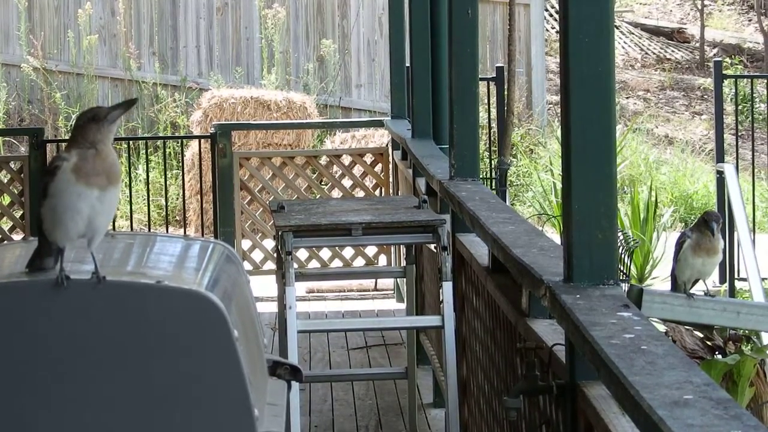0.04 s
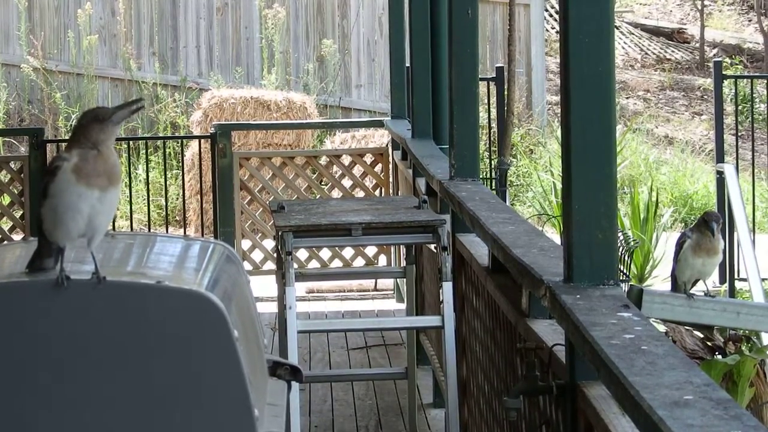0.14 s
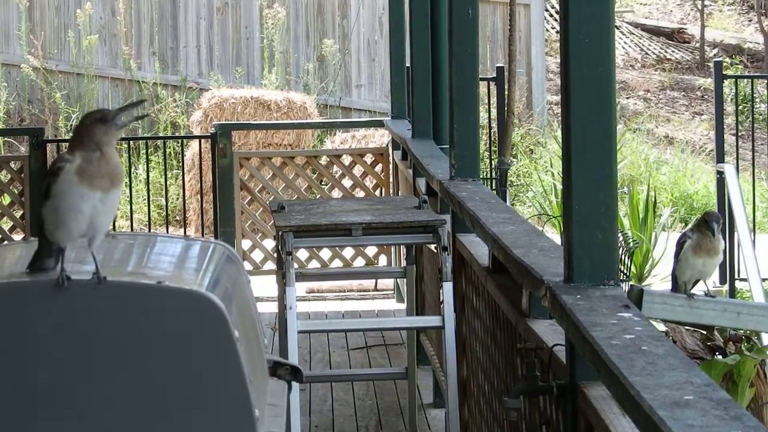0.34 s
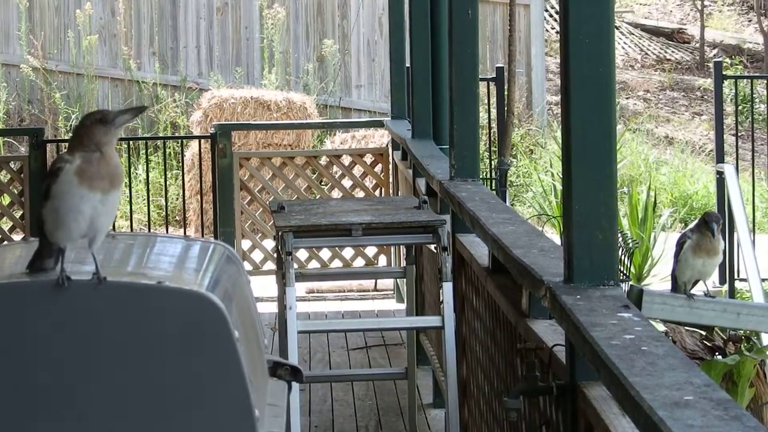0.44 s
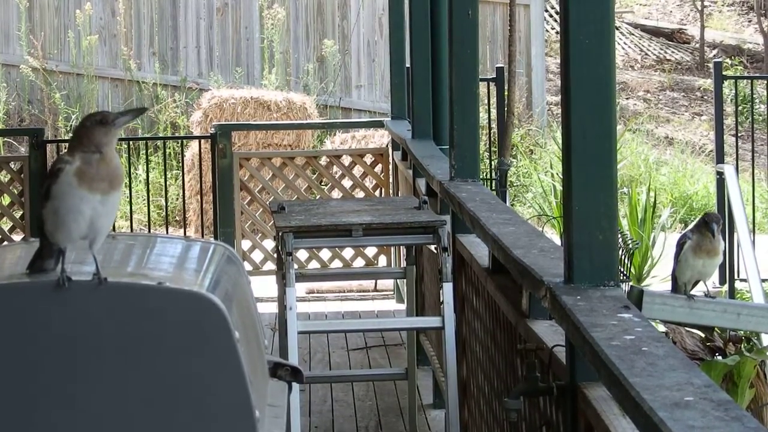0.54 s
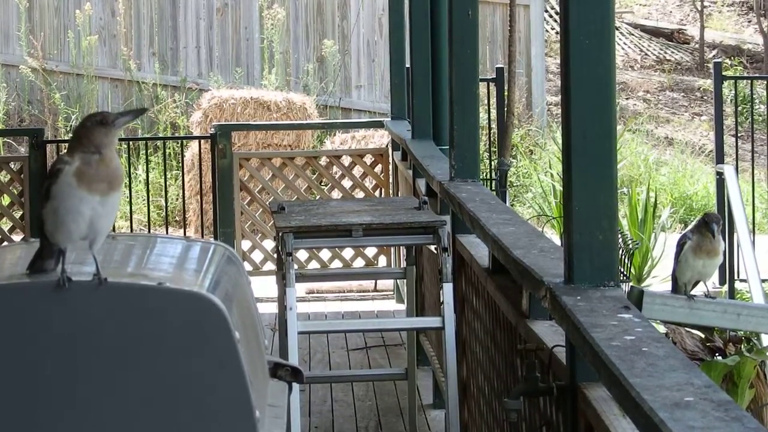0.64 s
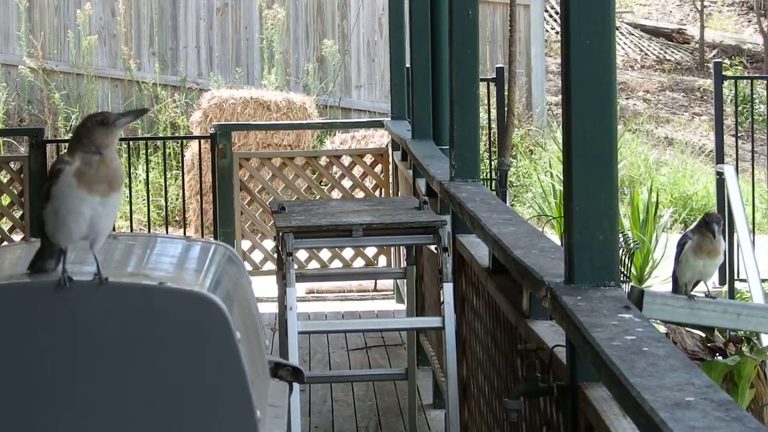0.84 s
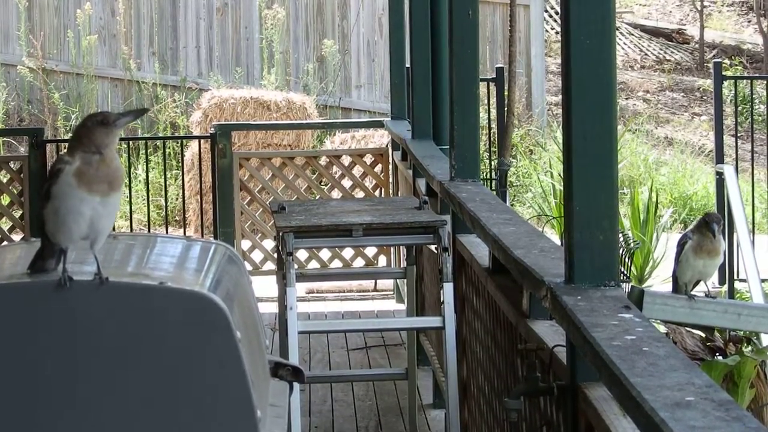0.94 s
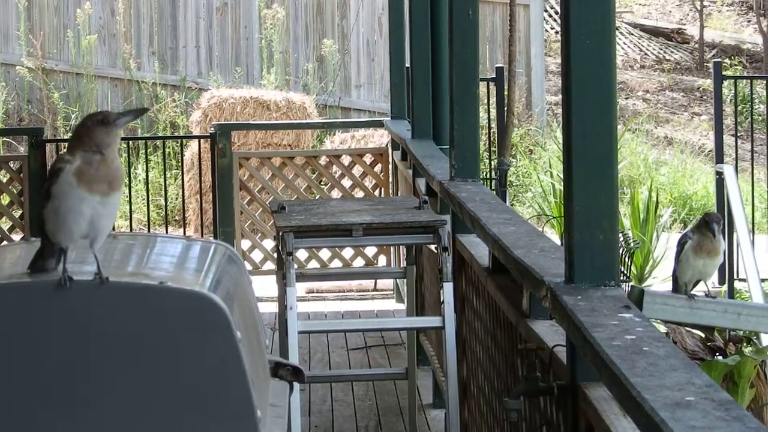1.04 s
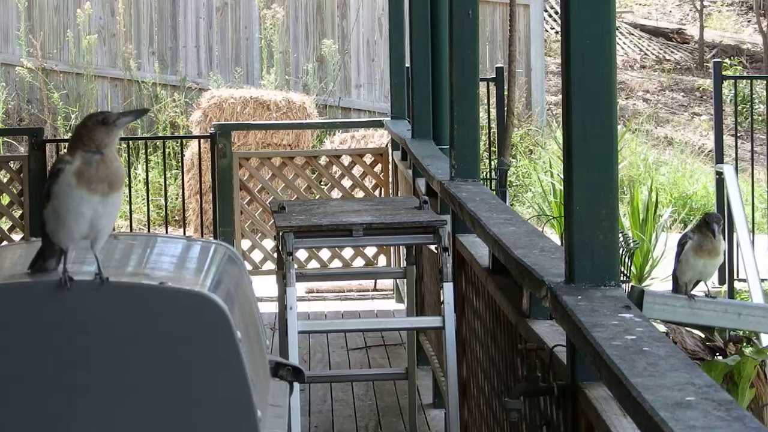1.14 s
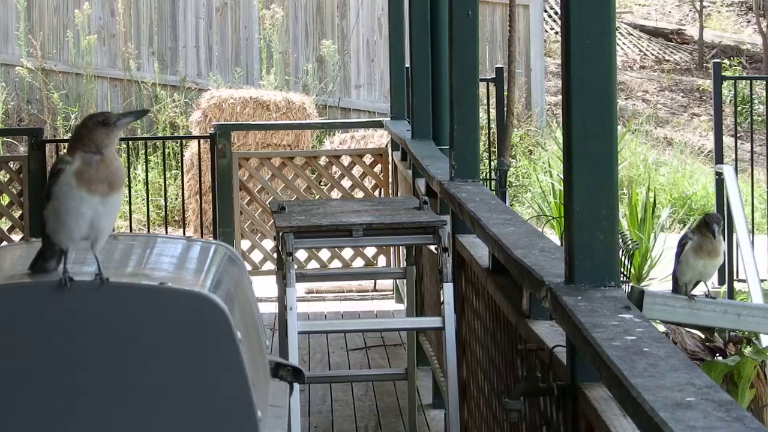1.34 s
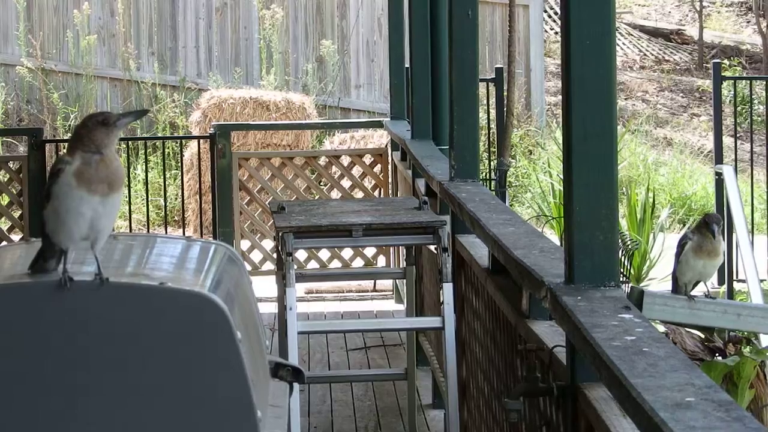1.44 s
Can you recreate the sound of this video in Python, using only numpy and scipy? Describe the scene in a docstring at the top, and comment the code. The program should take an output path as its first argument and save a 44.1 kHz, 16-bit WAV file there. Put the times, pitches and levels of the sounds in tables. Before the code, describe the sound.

A close bird's raspy screech snaps into a fading whistle, with insects hissing behind.

```python
"""A garden deck: insects hiss over a low rush and a faint drone. An earlier whistle dies away and far
birds pipe short fluty notes. At 0.13 s a young butcherbird begs close by: the two sides of its syrinx
clash in a rasp that swells into a screech as the beak opens. Near 0.37 s it snaps into a warbling,
fading whistle. The far birds pipe on, rush and insects grow, and a soft bump lands at 1.38 s."""
import sys
import numpy as np
from scipy import signal
from scipy.fft import rfft, irfft
from scipy.io import wavfile
from scipy.ndimage import uniform_filter1d

SR = 44100
rng = np.random.default_rng(int(sys.argv[2]) if len(sys.argv) > 2 else 0)


def wav_record(signal):
    """Record a signal, one row per channel, as 16-bit PCM in the file named by sys.argv[1]."""
    frames = np.transpose(np.atleast_2d(signal))
    bounded = np.clip(frames, -1, 1)
    # unit amplitude maps onto the largest positive 16-bit level
    quanta = np.round(bounded * 32767).astype(np.int16)
    wavfile.write(sys.argv[1], SR, quanta)


N = 66150
TIME = np.arange(N) / SR


def from_db(db):
    """Decibels to gain."""
    return 10 ** (np.asarray(db) / 20)


def unit_rms(x):
    """Scale to unit power."""
    return x / np.sqrt(np.mean(x ** 2) + 1e-20)


def automation(rows):
    """One curve per value column, ramping between the times in the first column."""
    times, *columns = np.transpose(rows)
    return [np.interp(TIME, times, column) for column in columns]


def gate(rows):
    """Open between a table's first and last time."""
    return (TIME > rows[0][0]) & (TIME < rows[-1][0])


def phase_of(hz):
    """Running phase of an oscillator that follows a pitch curve."""
    return 2 * np.pi * np.cumsum(hz) / SR


def equalise(x, curve):
    """Filter by a curve of f/Hz, level/dB."""
    hz, db = np.transpose(curve)
    bins_hz = np.maximum(np.arange(N + 1) * SR / (2 * N), 1)
    gain = from_db(np.interp(np.log(bins_hz), np.log(hz), db))
    return irfft(rfft(x, 2 * N) * gain)[..., :N]


def drift(hz):
    """Smooth random modulation at unit power, rolling off above hz."""
    pole = np.exp(-2 * np.pi * hz / SR)
    smooth = signal.lfilter([1], [1, -2 * pole, pole * pole], rng.standard_normal(2 * N))
    return unit_rms(smooth[N:])


def wide_noise(spectrum):
    """Coloured stereo noise arriving from a wide angle."""
    # Stereo width, side against mid: f/Hz, level/dB
    width = [(30, -5), (80, -32.5), (140, -25), (300, -11), (700, -23.5), (1200, -22), (2500, -8),
             (5000, -14), (6600, -16), (9000, -10), (13000, 2)]
    mid, side = (unit_rms(equalise(rng.standard_normal(N), spectrum)) for _ in range(2))
    return mid + equalise(side, width) * [[1], [-1]]


def drone():
    """A faint, steady band of noise near 79 Hz."""
    spectrum = [(20, -42), (60, -27), (79, 12), (104, -6), (200, -45), (1000, -100)]  # f/Hz, level/dB
    return from_db(-61.5) * wide_noise(spectrum)


def distant_rush():
    """A low rush that dips, slowly grows, and arrives a second time off the roof."""
    # Tone of the rush: f/Hz, level/dB
    spectrum = [(25, -53), (50, -30), (100, -17.5), (140, -5.5), (270, -5.5), (357, -2.5), (445, -6.5),
                (660, -1.5), (780, -2), (910, -7.5), (1050, -8.5), (1360, -25.5), (2000, -36), (4400, -86)]
    # Its swell: t/s, level/dB
    swell = [(0, -42), (.2, -36.5), (.5, -45), (.65, -42.5), (.9, -40), (1.05, -35.5), (1.25, -32),
             (1.5, -31.5)]
    roof_delay_s = .01424
    rush = wide_noise(spectrum)
    roof_echo = 0.3 * np.roll(rush, int(roof_delay_s * SR), axis=1)
    return (rush + roof_echo) * from_db(automation(swell)[0])


def distant_bump(at_s=1.38, width_s=0.02):
    """A soft, far-off bump: a brief swell of low noise."""
    # Tone of the bump: f/Hz, level/dB
    spectrum = [(20, -45), (50, -25), (110, 2), (150, 11), (210, -5), (400, -25), (2000, -90)]
    envelope = np.exp(-((TIME - at_s) / width_s) ** 2)
    return wide_noise(spectrum) * from_db(-39) * envelope


def insects():
    """A chorus blurred into a bright, lightly throbbing hiss."""
    # Tone of the chorus: f/Hz, level/dB
    spectrum = [(760, -15), (1300, -10.5), (1380, -11), (1420, -15), (1550, -16), (2380, -12.5),
                (2800, -13), (3030, -13), (3580, -16.5), (4080, -16), (4330, -10.5), (4830, -5.5),
                (5890, -11), (6070, -14.5), (6380, -1.5), (6580, 1), (6770, -0.5), (7120, -10.5),
                (7790, -18.5), (9880, -29.5), (12100, -31.5), (14000, -47)]
    # Its swell: t/s, level/dB
    swell = [(0, -43), (.55, -46), (.8, -43), (1.05, -40.5), (1.25, -37), (1.5, -35.5)]
    hiss = wide_noise(spectrum)
    throb_db = 0.45 * drift(44.6)
    return hiss * from_db(automation(swell)[0] + throb_db)


def background_notes():
    """The fading tail of an earlier whistle, then far birds' soft fluty notes; each is a short glide."""
    # Whistle tail first, then the far birds: t/s, length/s, start f/Hz, end f/Hz, level/dB
    notes = [(-.02, 0.071, 2820, 2800, -47.5), (0, 0.04, 1354, 1240, -45.5),
             (0.057, 0.064, 930, 894.6, -35), (0.147, 0.067, 1030, 994, -31.5),
             (0.402, 0.086, 860, 823, -37.5), (0.466, .08, 928, 905, -43.5), (.665, 0.072, 1170, 1065, -44),
             (0.729, 0.056, 612.5, 558.5, -41), (0.757, 0.052, 1136, 1091, -37.5),
             (0.809, 0.072, 1027, 984, -34.5), (0.847, 0.049, 960, 904, -40.5),
             (1.039, 0.085, 1124, 1129, -27.5), (1.121, 0.063, 1333, 1347, -36.5),
             (1.15, 0.036, 1127, 1117, -31)]
    waver = 1 + 0.0181 * drift(77)
    song = np.zeros(N)
    for onset, length, start_hz, end_hz, db in notes:
        progress = np.clip((TIME - onset) / length, 0, 1)
        hz = (start_hz + (end_hz - start_hz) * progress) * waver
        song += np.sqrt(2) * from_db(db) * np.sin(np.pi * progress) * np.sin(phase_of(hz))
    flicker_db = 2 * drift(55)
    return song * from_db(flicker_db)


def deck_reverb(x, t60_s=0.34, predelay_s=0.0046, damping_hz=5300):
    """A dull, nearly mono tail of reflections from roof, boards and fence."""
    tails = rng.standard_normal((2, N)) * from_db(-60 * TIME / t60_s) * (TIME > predelay_s)
    tails = signal.lfilter([1], [1, -np.exp(-2 * np.pi * damping_hz / SR)], tails)
    mid, side = (signal.fftconvolve(x, tail / np.sqrt(2 * np.sum(tail ** 2)))[:N] for tail in tails)
    return mid + from_db(-30) * side * [[1], [-1]]


def early_echoes(x):
    """Single reflections from the hard surfaces near the perch."""
    # Off the barbecue lid, rail, posts and roof: delay/s, gain
    taps = [(.00179, .3), (.00317, .15), (.00644, .12), (.00823, .13), (.01125, .14), (.01578, .11),
            (.02624, .1)]
    return sum(gain * np.interp(TIME - delay_s, TIME, x, left=0) for delay_s, gain in taps)


def perch_scatter(x, gain=0.47):
    """Very short reflections around the perch smear the pulses without colouring them."""
    omega = 2 * np.pi * np.arange(N + 1) * SR / (2 * N)
    spectrum = rfft(x, 2 * N)
    for delay_s in (.00047, .00083, .0013):
        delay = np.exp(-1j * omega * delay_s)
        spectrum = spectrum * (delay - gain) / (1 - gain * delay)  # all-pass
    return irfft(spectrum)[:N]


def beak_squeak(bandwidth_hz=450):
    """A thin squeak of air in a high, rising resonance at the opening beak."""
    # Path of the resonance: t/s, centre f/Hz, level/dB
    sweep = [(.135, 9100, -75), (.16, 9260, -57), (.21, 10100, -46), (.25, 10600, -54), (.28, 10500, -74)]
    hz, db = automation(sweep)
    phase = phase_of(hz)
    air = drift(bandwidth_hz) * np.sin(phase) + drift(bandwidth_hz) * np.cos(phase)
    return air * from_db(db) * gate(sweep)


def flickering_overtone(phase, depth=1.31, rate_hz=90):
    """An overtone whose strength and phase wander, with the power of a unit sine."""
    in_phase = np.sin(phase) * (1 + depth * drift(rate_hz))
    quadrature = np.cos(phase) * depth * drift(rate_hz)
    return unit_rms(in_phase + quadrature) / np.sqrt(2)


def whistle(beat_jitter_hz=15.2, overtone_fade_db_per_s=26):
    """A note that warbles as close tones beat against it, and grows purer as it fades."""
    # The main tone: t/s, f/Hz, level/dB
    contour = [(.352, 2742, -34), (.367, 2820, -16), (.381, 2848, -18), (.398, 2850, -18.5),
               (.42, 2845, -24.5), (.45, 2868, -31), (.465, 2868, -35), (.52, 2870, -47), (.64, 2864, -58)]
    # Tones beating against it: offset f/Hz, relative level/dB, beat peak t/s
    warble = [(-63, -6.5, .381), (57, -1.5, .394), (121, -13.5, .381)]
    # Overtones at the onset: harmonic number, relative level/dB
    harmonics = [(2, -14), (3, -20.5), (4, -24)]
    hz, db = automation(contour)
    phase = phase_of(hz * (1 + 0.0033 * drift(126)))
    tone = np.sin(phase)
    for offset_hz, level, peak_s in warble:
        beat = phase_of(offset_hz + beat_jitter_hz * drift(46))
        tone += from_db(level) * np.sin(phase + beat - np.interp(peak_s, TIME, beat))
    overtones = sum(from_db(level) * flickering_overtone(k * phase) for k, level in harmonics)
    fade = from_db(-overtone_fade_db_per_s * np.maximum(TIME - contour[0][0], 0))
    return np.sqrt(2) * from_db(db) * gate(contour) * (tone + fade * overtones)


def syrinx_side(hz, roughness):
    """Jittered pulses with a puff of air noise in every cycle."""
    jitter = 0.1266 * roughness * drift(290)
    phase = phase_of(hz * (1 + jitter))
    pulses = unit_rms(sum(np.cos(k * phase) for k in range(1, 15)))
    air = unit_rms(rng.standard_normal(N) * (1 + np.cos(phase)))
    return pulses * (1 - roughness / 2) + 2 * roughness * air


def rasp():
    """Two clashing voices roughen into a screech, through a throat that brightens as the beak opens."""
    # Both sides of the syrinx: t/s, upper f/Hz, lower f/Hz, lower side's relative level/dB
    pitches = [(.13, 977.6, 898, 2), (.17, 1002, 924, 18), (.205, 1020, 930.2, -14),
               (.25, 1034, 924.8, -4.5), (.30, 1068, 1012, -5.5), (.325, 1116, 1022, -9),
               (.345, 1222, 1080, 1), (.37, 1274, 1111, -2)]
    # How hard the bird pushes: t/s, level/dB, roughness (0-1)
    effort = [(.13, -45.5, 0.2), (.158, -36, 0.15), (.21, -26.5, 0.21), (.25, -26.5, 0.15),
              (.275, -22.5, 0.16), (.32, -20, .3), (.342, -15.5, 0.6), (.366, -16.5, 0.77),
              (.38, -27, 0.67), (.40, -48, 0)]
    # The beak's movement: t/s, opening (0 nearly shut, 1 half, 2 wide)
    beak = [(.212, 0.019), (.24, 0.41), (.275, 1.03), (.315, 1), (.348, 2.24)]
    # Throat resonances at those three openings: f/Hz, level/dB
    throat_shut = [(300, -24), (700, 5), (1000, 2), (1400, -3), (1900, 1), (2300, 0.5), (3000, -18),
                   (4000, -36.5), (6500, -16), (8200, -55), (9900, -39), (11000, -32), (12200, -26),
                   (14000, -49)]
    throat_half = [(100, -28), (300, -17), (1000, -6), (1450, -8), (2100, -7.5), (2550, -13), (3150, 2),
                   (3650, -6), (4150, 0), (4700, -5.5), (5150, -1), (5550, -2.5), (5850, -14),
                   (6400, -11.5), (7400, -6), (8400, -19), (9800, -10.5), (11000, -22.5), (12200, -20),
                   (14000, -38)]
    throat_wide = [(100, -41), (300, -26), (1000, -12.5), (1400, -17), (2200, -0.5), (2900, 0), (3800, 1),
                   (4600, -11), (5800, -16), (7400, -9), (9000, -20), (10600, -21.5), (12400, -28),
                   (14000, -35)]
    upper_hz, lower_hz, lower_db = automation(pitches)
    db, roughness = automation(effort)
    opening = automation(beak)[0]
    source = syrinx_side(upper_hz, roughness) + from_db(lower_db) * syrinx_side(lower_hz, roughness)
    voice = np.zeros(N)
    for position, throat in enumerate((throat_shut, throat_half, throat_wide)):
        crossfade = np.clip(1 - abs(opening - position), 0, 1)
        voice += crossfade * unit_rms(equalise(source, throat))
    voice = perch_scatter(voice)
    voice /= np.sqrt(uniform_filter1d(voice ** 2, size=260) + 1e-12)  # level out over 6 ms
    flutter_db = 1.5 * drift(142)
    return voice * from_db(db + flutter_db) * gate(effort)


def pan(db):
    """Stereo gains that put the left channel db above the right."""
    return from_db(np.array([[db], [-db]]) / 2)


def scene():
    """The begging call up front, the background notes deeper in the reverb, the garden bed behind."""
    call = rasp() + beak_squeak() + whistle()
    notes = background_notes()
    call = call + from_db(1) * early_echoes(call) + from_db(-11) * deck_reverb(call)
    notes = notes + from_db(-4.5) * deck_reverb(notes)
    bed = (distant_rush() + distant_bump()) * pan(2) + insects() * pan(-0.15) + drone()
    return bed + notes * pan(1.5) + call * pan(1.06)


def record(dry, cutoff_hz=14200):
    """A steep low-pass takes off the very top."""
    return signal.sosfilt(signal.ellip(12, .1, 80, cutoff_hz, fs=SR, output="sos"), dry)


dry = scene()
out = record(dry)
wav_record(out)
```